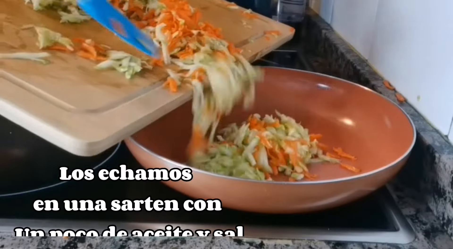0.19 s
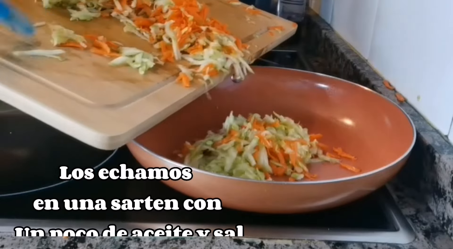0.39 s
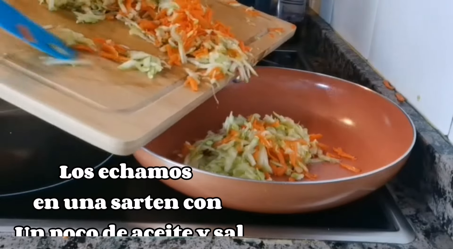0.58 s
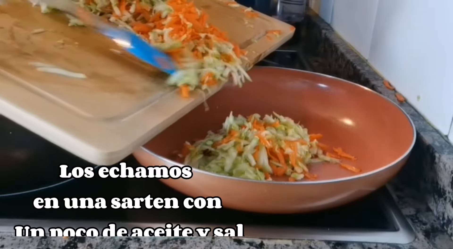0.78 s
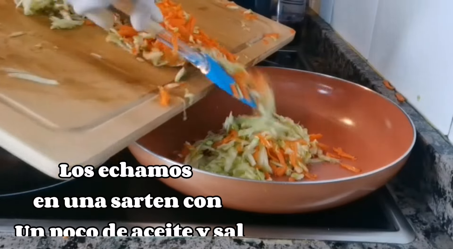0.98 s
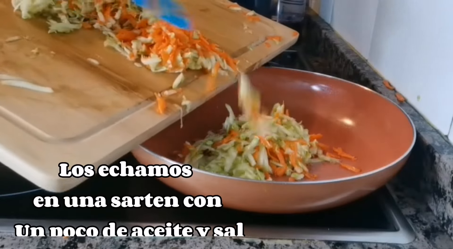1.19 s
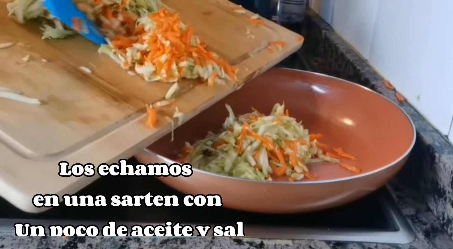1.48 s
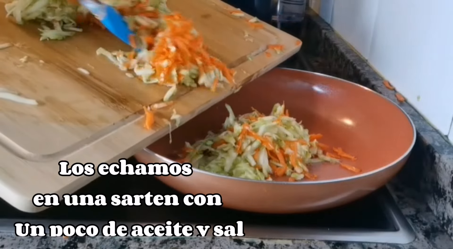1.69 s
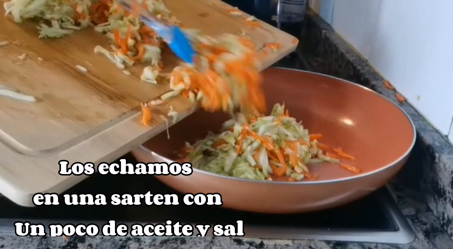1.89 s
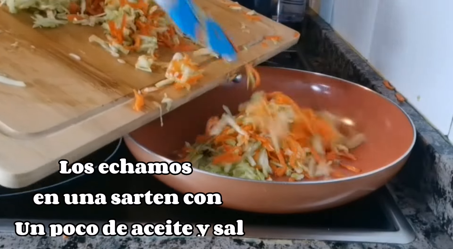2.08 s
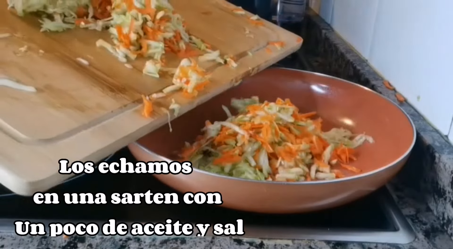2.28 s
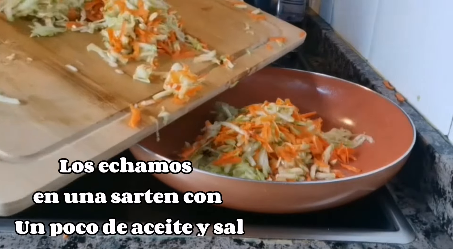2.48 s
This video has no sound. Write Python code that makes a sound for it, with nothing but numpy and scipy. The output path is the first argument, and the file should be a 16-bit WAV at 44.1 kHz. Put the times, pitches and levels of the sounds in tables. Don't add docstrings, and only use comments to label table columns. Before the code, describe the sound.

Wooden board against frying pan, close in a small tiled kitchen with a low motor hum. Light knocks and wet ticks until 0.2 s; at 0.25 s a sharp slap and loud juddering rattle with a deep board boom, fading by 0.55. A rubber spatula hisses and squeaks softly 0.6-1.0, faint taps follow, then knocks at 1.6 and 1.9, with small wet ticks to 2.3.

```python
import sys
import numpy as np
from scipy import signal
from scipy.fft import rfft, irfft
from scipy.io import wavfile
from scipy.ndimage import uniform_filter1d

SR = 44100
rng = np.random.default_rng(int(sys.argv[2]) if len(sys.argv) > 2 else 0)


def nominal_scale(level):
    x = np.asarray(level, float) / 20
    return 10 ** x


def digitize_waveform(pressure):
    field = np.atleast_2d(pressure).T
    bounded = np.clip(field, -1, 1)
    quanta = np.round(bounded * 32767).astype(np.int16)
    wavfile.write(sys.argv[1], SR, quanta)


N = 114660
T = np.arange(N) / SR

# f/Hz, level/dB
RATTLE_TONE = [(90, -41.5), (270, -28), (450, -0.5), (800, -2), (1400, -1.5), (2500, -15.5), (5000, -23.5),
               (15000, -35.5)]
# f/Hz, level/dB, time to fall 60 dB/s
BOARD_MODES = [(353.5, -18, .25), (419, -24, .25), (467.2, 8.5, 0.2), (570, -16, .2), (653, -2.5, 0.45),
               (727.2, 9, 0.24), (952, 5.5, .25), (1062.8, 10, 0.2), (1400, -11, .15), (1590, -8.5, 0.17),
               (1710, -10.5, .2), (1913, -9, .2), (2180, -14.5, .15), (2410, -12.5, 0.25)]
JUDDER_SIDE_DB = -3
SLAP_S = .2485


def unit(x):
    return x / np.sqrt(np.mean(x ** 2))


def curve(rows):
    return nominal_scale(np.interp(T, *np.array(rows).T))


def gated(rows):
    return curve(rows) * (T > rows[0][0]) * (T < rows[-1][0])


def band(x, order, hz, kind="low"):
    return signal.sosfilt(signal.butter(order, hz, kind, fs=SR, output="sos"), x)


def colour(x, points):
    hz, db = np.array(points, float).T
    f = np.fft.rfftfreq(4096, 1 / SR)
    log_gain = np.interp(np.log(f + 1), np.log(hz), db) * np.log(10) / 20
    cepstrum = irfft(log_gain)
    cepstrum[1:2048] *= 2
    cepstrum[2049:] = 0
    response = irfft(np.exp(rfft(cepstrum)))
    return signal.fftconvolve(np.atleast_2d(x), response[None], axes=1)[:, :N]


def ring(x, modes):
    longest_s = .17
    out = 0
    chance = rng.standard_normal((len(modes), 2))
    for (hz, db, t60), (a, b) in zip(modes, chance):
        fall_s = t60 if hz < 300 else min(t60, longest_s)
        pole = np.exp((2j * np.pi * hz - np.log(1000) / fall_s) / SR)
        note = signal.lfilter([1], [1, -pole], x)
        differ = min(hz / 900, 1) * (.3 * a + 1j * (1.6 + 1.2 * b))
        left = (note * np.exp(differ / 2)).imag
        right = (note * np.exp(-differ / 2)).imag
        out = out + nominal_scale(db) * np.array([left, right])
    return out


def left_right(db):
    return nominal_scale(np.array([[db / 2], [-db / 2]]))


def walk(rate):
    k = int(SR / rate)
    steps = np.repeat(rng.standard_normal(N // k + 1), k)
    return 1.4 * uniform_filter1d(uniform_filter1d(steps, k), k)[:N]


def grains(rate, spread_db):
    when = rng.random(N) < rate / SR
    size = np.minimum(rng.exponential(size=N), 3)
    return unit(when * rng.standard_normal(N) * nominal_scale(spread_db * size))


def pair(differ):
    mid, side = rng.standard_normal((2, N))
    side = band(side, 2, 247, "high")
    return (mid + differ * side * np.array([[1], [-1]])) / np.sqrt(2)


def judder_level():
    # t/s, friction level/dB
    judder_rows = [
        (.229, -56),
        (.236, -38.5),
        (.248, -26.5),
        (.27, -38),
        (.33, -31),
        (.39, -40),
        (.45, -52),
        (.53, -66),
    ]
    return gated(judder_rows)


def slap():
    start_s, rise_s, fall_s, crack_s = 0.25, 0.009, 0.0081, 0.00042
    d = T - SLAP_S
    swell = np.exp(np.where(d < 0, d / rise_s, -d / fall_s))
    rush = nominal_scale(-29) * swell * np.clip((T - start_s) / 0.00095, 0, 1)
    crack = nominal_scale(-16.5) * np.exp(-np.abs(d) / crack_s)
    air = pair(1.0)
    both = rush * air + band(crack * air, 2, 6800, "high")
    return left_right(-11.5) * band(both, 3, [900, 11900], "band")


def judder():
    force = grains(900, 0.63)
    on = judder_level()
    rattle = unit(colour(0.34 * force + pair(1.0), RATTLE_TONE))
    body = nominal_scale(-0.5) * ring(force * on, BOARD_MODES) / np.std(ring(force, BOARD_MODES))
    hit = 1. * (np.arange(N) == int(SLAP_S * SR))
    body += nominal_scale(-40.5) * ring(hit, BOARD_MODES)
    return nominal_scale(-0.5) * left_right(JUDDER_SIDE_DB) * (on * rattle + body) + slap()


def jolts():
    # t/s, strength/dB
    catches = [(.2495, -26), (.2575, -23), (.268, -26), (.273, -24.5), (.2895, -17.5), (.3045, -28.5),
               (.3175, -24.5), (.322, -23), (.3255, -27), (.3315, -18.5), (.346, -30.5), (.356, -24),
               (.372, -27.5), (.379, -25.5), (.412, -31.5)]
    contact_ms = 0.13
    push = 0
    for s, db in catches:
        u = np.clip(T - s, 0, 1) * 1000 / contact_ms
        push = push + nominal_scale(db) * u * np.exp(1 - u)
    click = band(push, 2, [420, 1500], "band")
    return left_right(JUDDER_SIDE_DB) * (nominal_scale(5) * click + nominal_scale(-43.5) * ring(push, BOARD_MODES))


def boom():
    # t/s, level/dB
    boom_rows = [
        (.232, -63),
        (.248, -33),
        (.264, -38),
        (.294, -24.5),
        (.332, -24.5),
        (.42, -33),
        (.506, -39.5),
        (.545, -57),
        (.64, -66),
    ]
    hz = 131.9 + 5 * np.exp(-np.clip(T - SLAP_S, 0, 9) / .03)
    note = np.sqrt(2) * np.sin(2 * np.pi * np.cumsum(hz) / SR)
    return left_right(2.5) * gated(boom_rows) * nominal_scale(0.31 * walk(23)) * note


def crunch():
    grit = 0.38 * grains(2000, 2.5) + pair(.9)
    return nominal_scale(-30.5) * left_right(-3.5) * judder_level() * unit(band(grit, 2, 4200, "high"))


def sweep():
    # t/s, level/dB
    push_rows = [(0, -65), (0.201, -72), (0.501, -83), (0.599, -81.5), (.65, -58.5), (.8, -52.5),
                 (0.921, -58), (1.001, -80), (1.1, -83.5), (1.38, -99.5), (1.46, -84.5), (1.551, -67),
                 (1.699, -71.5), (1.899, -60.5), (2.05, -80), (2.181, -70), (2.3, -108.5), (2.6, -77)]
    # f/Hz, level/dB
    hiss_tone = [(300, -19.5), (800, -18.5), (1500, -6.5), (2000, -8.5), (2700, -4), (5000, -4),
                 (9000, -12), (15000, -6)]
    # f/Hz, level/dB, width/Hz, start t/s, end t/s
    squeaks = [
        (1115, -69.5, 150, 0.8, 1.01),
        (1526, -67, 320, 0.48, 1.04),
        (2490, -70.5, 570, 0.55, 1.06),
        (2490, -68, 310, 0.89, 1.014),
        (1690, -69, 330, 1.44, 1.65),
        (2670, -79, 370, 1.43, 1.84),
        (3020, -75.5, 180, 1.483, 1.58),
        (2260, -71.5, 1340, 1.413, 1.78),
    ]
    hiss = unit(colour(.7 * grains(4100, 4.9) + pair(1), hiss_tone))
    out = nominal_scale(-3 + 0.92 * walk(20)) * curve(push_rows) * hiss
    for hz, db, width_hz, start, end in squeaks:
        slow = band(rng.standard_normal((2, 2, N)), 2, width_hz / 2)
        turn = 2 * np.pi * np.cumsum(hz * (1 + 0.028 * walk(3.6))) / SR
        squeak = unit(slow[0] * np.cos(turn) + slow[1] * np.sin(turn))
        swell = np.sin(np.pi * np.clip((T - start) / (end - start), 0, 1))
        out = out + nominal_scale(db + 1.5 * walk(36.35)) * swell * squeak
    return left_right(5) * out


def knocks():
    # t/s, strength/dB, thump/dB, contact time/ms
    hits = [(.008, -49.5, 1.5, 0.45), (0.099, -50.5, 10.5, 1.8), (0.134, -48, 7, 0.46),
            (1.58, -28.5, 2.5, 0.38), (1.59, -35, -19, 0.34), (1.611, -34.5, -40, 0.47),
            (1.629, -41.5, -30, 0.3), (1.647, -39, 11, 0.41), (1.75, -63, 23.5, 0.74),
            (1.825, -40.5, 3, 0.48), (1.907, -35.5, 7, 0.99), (1.916, -35, 1, 0.356),
            (1.922, -38.5, 10, 1.14), (1.937, -55, 20.5, 2.15), (1.973, -55.5, 16, 0.74),
            (2.108, -61.5, 17, 1.1), (2.153, -54.5, 10, 0.92)]
    # f/Hz, level/dB, time to fall 60 dB/s
    pan_modes = [(359, -8.5, 0.091), (437.7, -3, 0.11), (485, 1, 0.27), (554, -8, 0.096), (655, -8.5, .15),
                 (970, 6, 0.34), (1055, 0, .2), (1410, 0, 0.18), (1470, 4.5, .2), (1780, -4.5, .15),
                 (2010, -5.5, .15), (2392, -2.5, 0.17), (2720, -4.5, .12), (2800, -5, .08)]
    # f/Hz, level/dB, time to fall 60 dB/s
    counter_modes = [(54.9, -1, 0.36), (98.7, -3, 0.46), (131, -3.5, 0.061), (172, -6, 0.18),
                     (195.8, -19.5, 0.59)]
    rattle_s = 0.011
    push, thump, shake = np.zeros((3, N))
    for s, db, thump_db, ms in hits:
        d = np.clip(T - s, 0, 1)
        u = d / (ms / 1000)
        pulse = u * np.exp(1 - u)
        push += nominal_scale(db) * pulse / np.sqrt(np.sum(pulse ** 2))
        thump += nominal_scale(db + thump_db) * pulse / pulse.sum()
        shake += nominal_scale(db) * np.clip(u / 2, 0, 1) * np.exp(-d / rattle_s) * 0.35 / ms
    rattle = unit(colour(0.28 * grains(1700, 3) + pair(0.75), RATTLE_TONE))
    rattle = band(rattle, 2, 6476)
    clack = nominal_scale(-21.5) * ring(push, pan_modes) + nominal_scale(-9.5) * shake * rattle
    return clack, nominal_scale(-0.5) * ring(thump, counter_modes)


def taps():
    # t/s, level/dB, pitch f/Hz, overtone level/dB
    touches = [(.008, -48, 979, 0), (.014, -69, 1027, -7), (0.134, -54.5, 935, -33), (.169, -68, 940, 12),
               (1.055, -75, 970, 8), (1.081, -74, 955, 7.5), (1.121, -59.5, 953, -1),
               (1.201, -69.5, 964, -8), (1.582, -43.5, 970, 8), (1.598, -44.5, 1850, 1.5),
               (1.626, -66, 910, -1), (1.774, -70, 975, 8), (1.859, -63.5, 940, 7), (1.915, -51, 1428, 14),
               (1.926, -54, 928, 16), (2.108, -54, 900, -11), (2.113, -54, 1030, -1), (2.131, -56, 900, -7),
               (2.153, -57, 960, -4.5), (2.171, -59, 1160, -8.5), (2.183, -63, 1150, -11),
               (2.199, -61.5, 1049, -7.5), (2.271, -60, 816, -17), (2.277, -59.5, 1045, -22)]
    overtone, scuff_s, t60_s = 1.61, .0015, 0.03
    out = 0
    noise = rng.standard_normal(N)
    for s, db, hz, over_db in touches:
        scuff = noise * (T >= s) * np.exp(-np.clip(T - s, 0, 1) / scuff_s)
        touch = (np.arange(N) == int(s * SR)) + 0.27 * scuff / np.sqrt(np.sum(scuff ** 2))
        modes = [(hz, 0, t60_s), (hz * overtone, over_db, t60_s)]
        out = out + nominal_scale(db + 1) * ring(touch, modes)
    return out


def ticks():
    # t/s, peak level/dB, left over right/dB, tilt/(dB per octave)
    bursts = [(0.0137, -41.5, 4, -1), (0.0462, -39.5, 0.5, 2.5), (0.0723, -40, 4, 3), (0.1083, -53, 7.5, 7),
              (0.1306, -41, 11, -5.5), (0.1406, -45, 9, 1), (0.6484, -46, 10, 7.5), (0.8883, -33, 7.5, -4),
              (1.4487, -66, 15, -1), (1.584, -45, 1.5, -7), (1.596, -43.5, 3.5, -10), (1.7495, -50, 12, -4),
              (1.7833, -48, 11.5, 5.5), (1.9116, -40, 6.5, -5.5), (1.916, -30, 6.5, -8.5),
              (1.9476, -48, 5, 0), (2.0229, -47.5, 8, 2.5), (2.135, -54, 5.5, -12), (2.15, -49, 11, -3.5),
              (2.1671, -48.5, 12.5, 1), (2.229, -72, 6, -3.5)]
    rise_s, fall_s = 0.00039, 0.0063
    out = 0
    noise = pair(0.2)
    for s, db, side_db, tilt_db in bursts:
        shape = np.clip((T - s) / rise_s, 0, 1) * np.exp(-np.clip(T - s, 0, 1) / fall_s)
        tone = [(1000, -32 - 0.92 * tilt_db), (4000, -1.2 * tilt_db), (16000, 0.72 * tilt_db)]
        out = out + nominal_scale(db - 12.5) * left_right(side_db) * colour(shape * noise, tone)
    return out


def hum():
    # f/Hz, level/(dB per Hz)
    air_tone = [(35, -6.5), (72, -17), (125, -9.5), (200, -24), (430, -36), (690, -34), (3400, -53.5),
                (16000, -71.5)]
    # f/Hz, level/dB, wobble/dB
    motor_notes = [(53.5, -63.5, -4), (101, -58.5, -4), (150.5, -72.5, 6), (544, -90.5, -1.5),
                   (642, -89.5, -0.5), (691, -87, -2.5), (1215, -92.5, 2)]
    out = nominal_scale(-65.5) * unit(colour(pair(1), air_tone))
    for hz, db, wobble_db in motor_notes:
        drift = 0.0051 * walk(4.4) * min(100 / hz, 1)
        turn = 2 * np.pi * np.cumsum(hz * (1 + drift)) / SR
        wobble = min(wobble_db, 3) * np.clip(walk(4.1), -2, 1)
        out = out + np.sqrt(2) * nominal_scale(db + wobble) * np.sin(turn)
    return out


def room(x):
    low_t60_s, high_t60_s, split_hz = 0.5, 0.4, 8000
    t = T[:SR // 2]
    noise = pair(0.99)[:, :len(t)]
    low = band(noise, 1, split_hz)
    tail = low * nominal_scale(-60 * t / low_t60_s) + (noise - low) * nominal_scale(-60 * t / high_t60_s)
    tail = tail * np.clip(t / .004, 0, 1)
    tail = tail / np.sqrt(np.sum(tail ** 2) / 2)
    return x + nominal_scale(-4.5) * signal.fftconvolve(x.mean(0)[None], tail, axes=1)[:, :N]


def scene():
    clack, thump = knocks()
    close = taps() + jolts()
    wet = nominal_scale(-6)
    in_room = judder() + sweep() + ticks() + clack + crunch() + wet * close
    return room(in_room) + (1 - wet) * close + thump + boom() + hum()


def roll_off(x):
    return signal.sosfilt(signal.butter(12, 16110, fs=SR, output="sos"), x)


def record(dry):
    # f/Hz, level/dB
    mic_tone = [(3000, 0.39), (3750, -5), (5200, 4), (6600, -0.5), (7300, -8.5), (9250, 18.5), (11200, 7.5),
                (16000, 2.5)]
    notch_hz, notch_width_hz, notch_share = 3486, 120, .7
    notched = signal.lfilter(*signal.iirnotch(notch_hz, notch_hz / notch_width_hz, SR), dry)
    left, right = colour(dry + notch_share * (notched - dry), mic_tone)
    right = colour(right, [(9500, 0.0033), (13000, -10.5)])[0]
    hiss = nominal_scale(-91) * rng.standard_normal((2, N))
    mix = band(np.array([left, right]) + hiss, 6, 44, "high")
    return roll_off(mix)


dry = scene()
out = record(dry)
digitize_waveform(out)
```